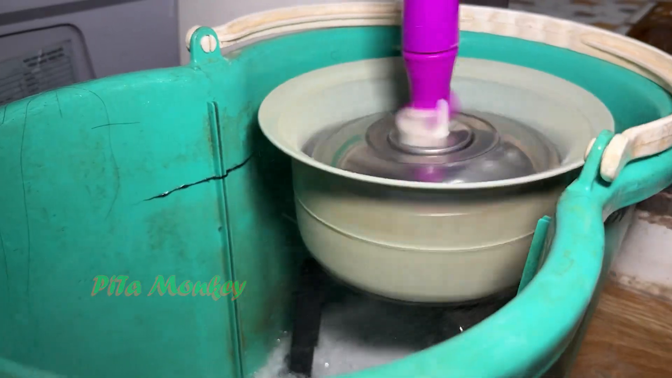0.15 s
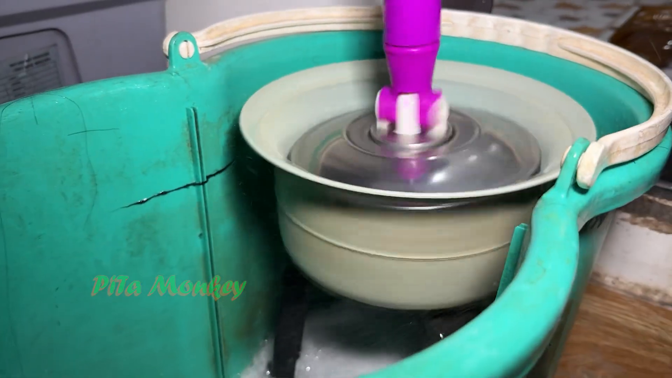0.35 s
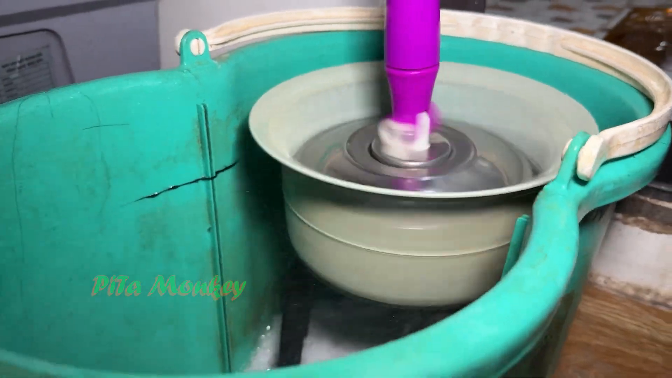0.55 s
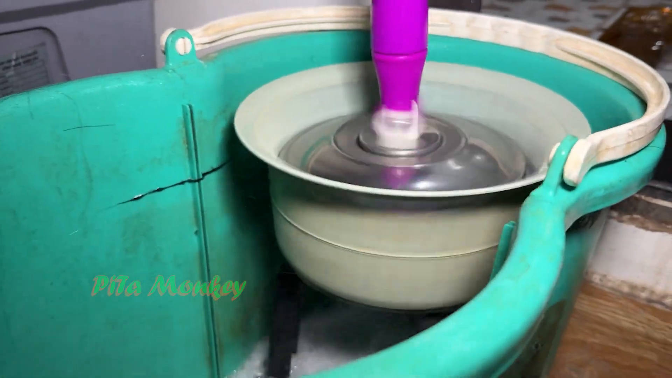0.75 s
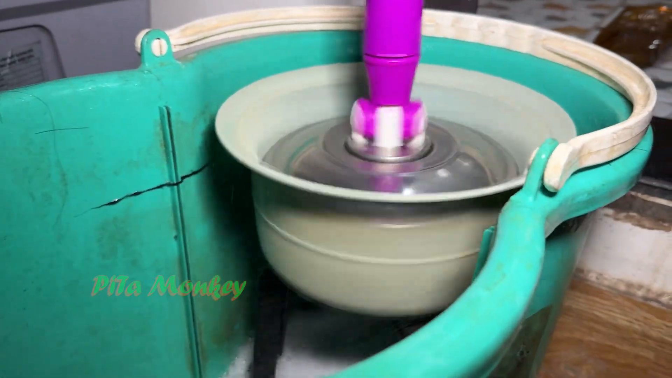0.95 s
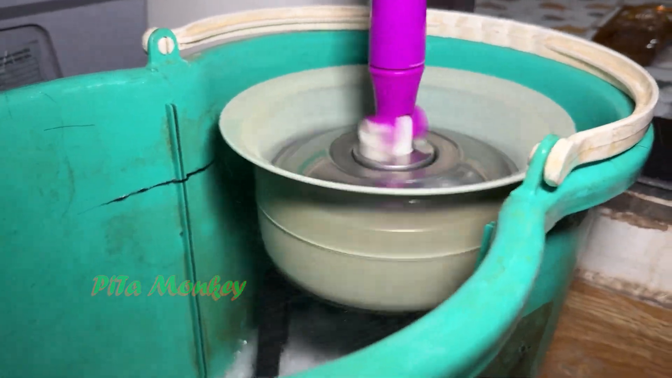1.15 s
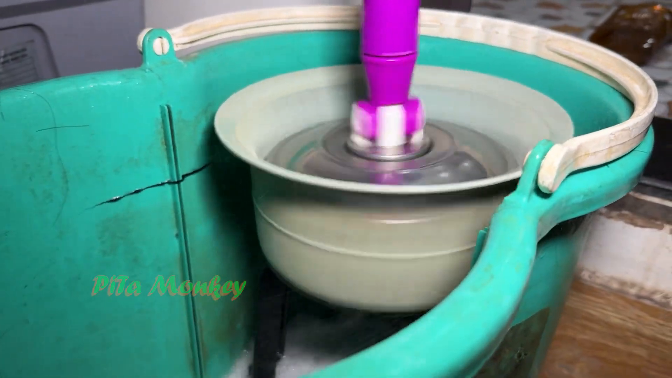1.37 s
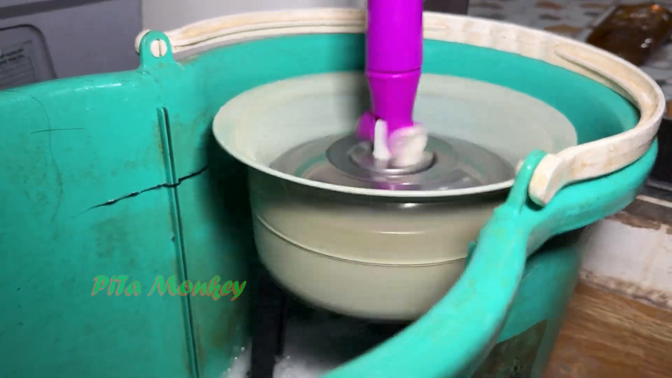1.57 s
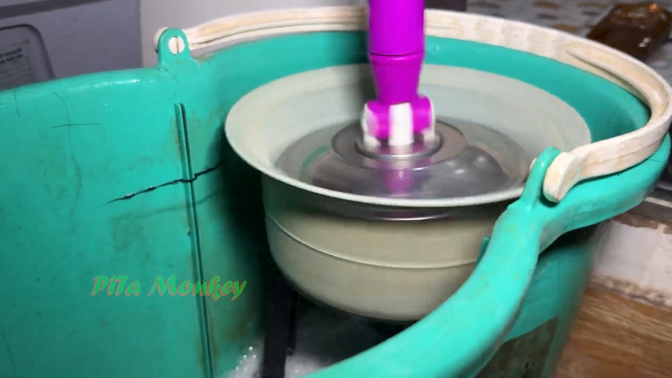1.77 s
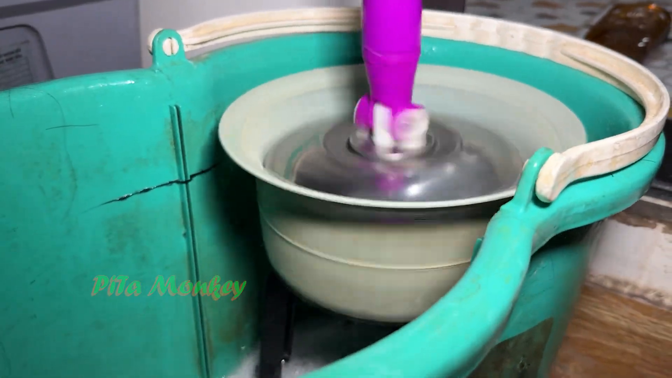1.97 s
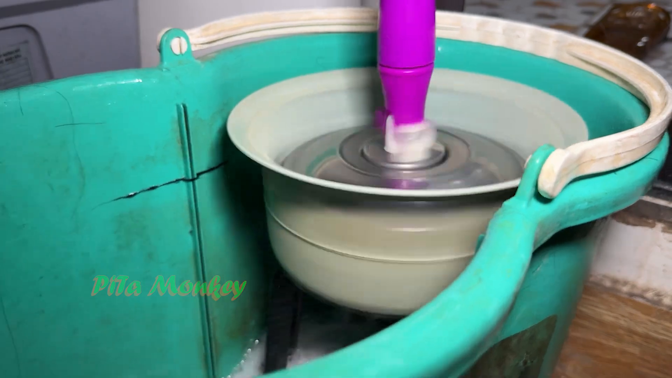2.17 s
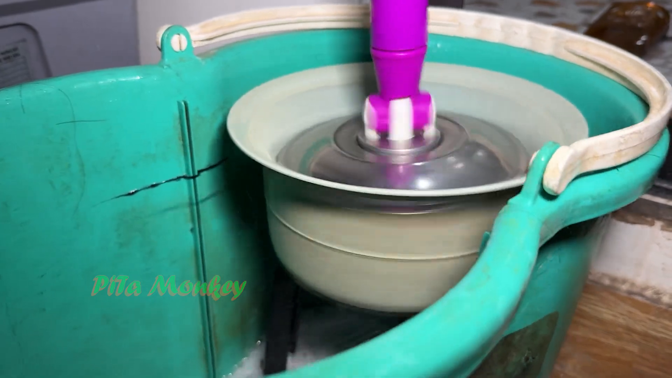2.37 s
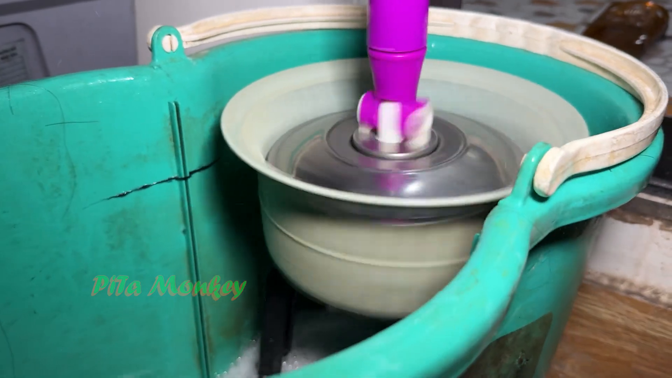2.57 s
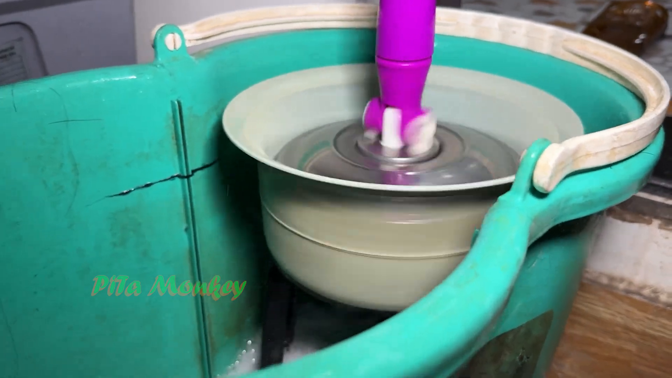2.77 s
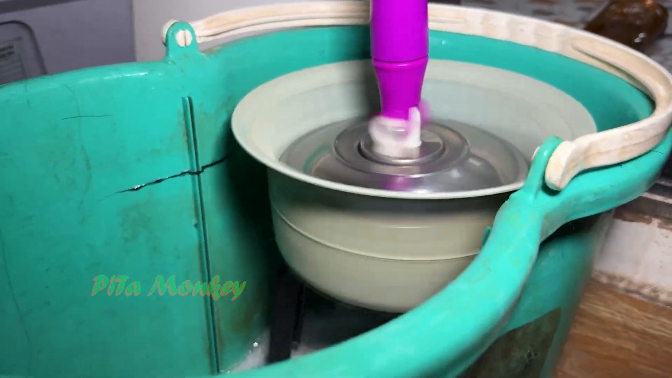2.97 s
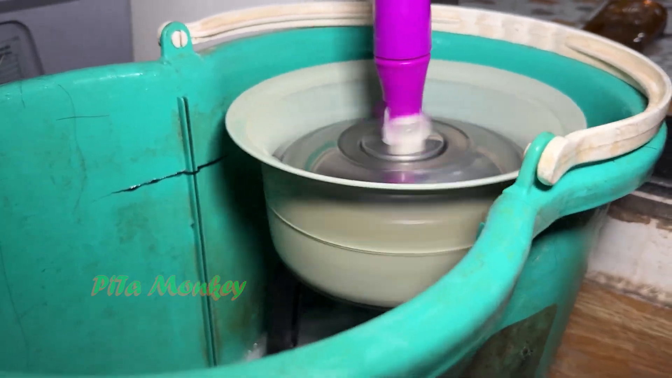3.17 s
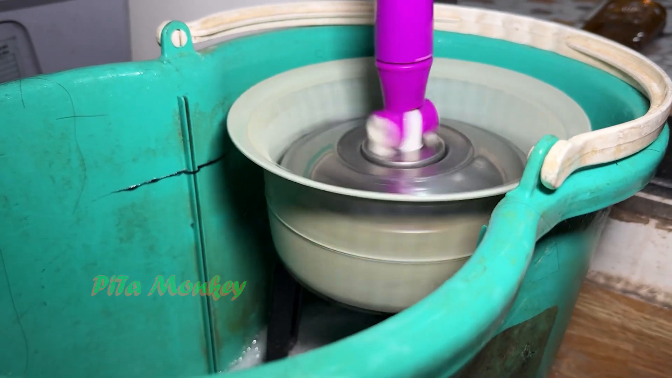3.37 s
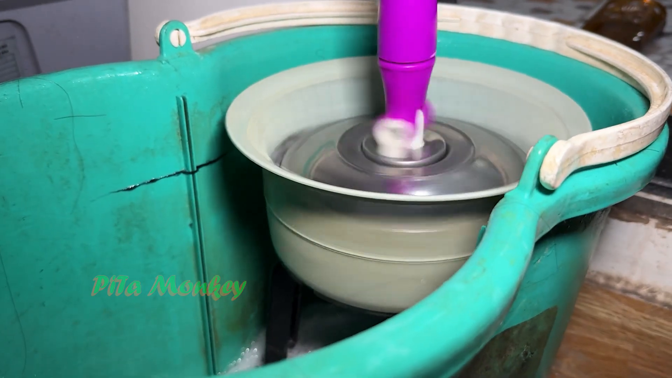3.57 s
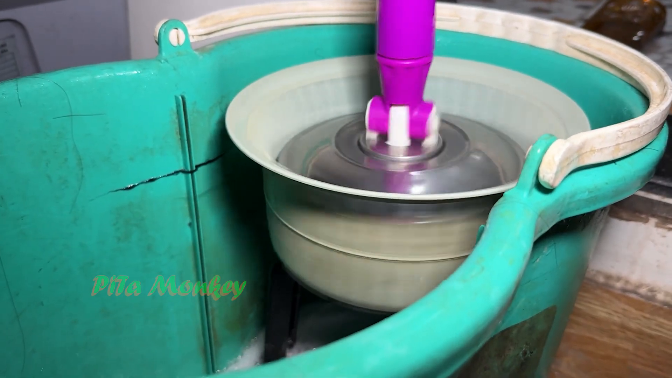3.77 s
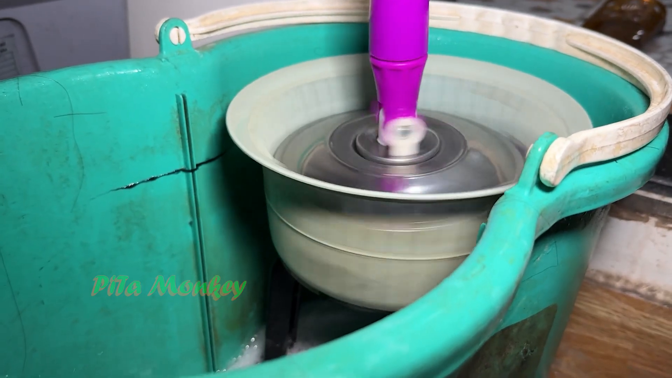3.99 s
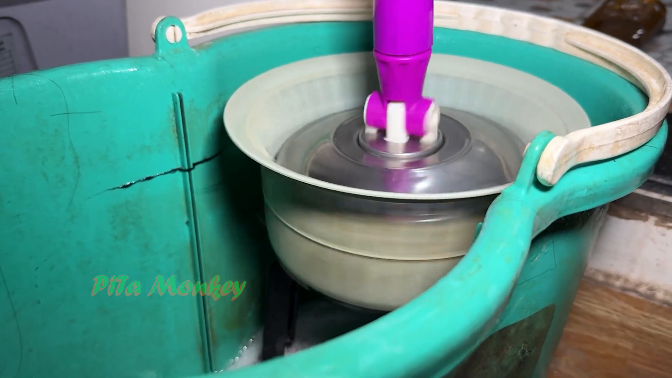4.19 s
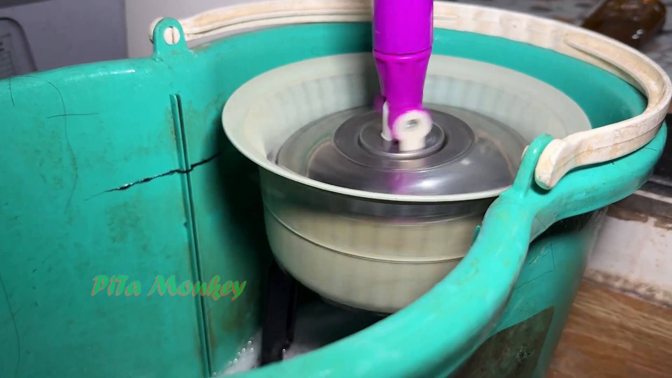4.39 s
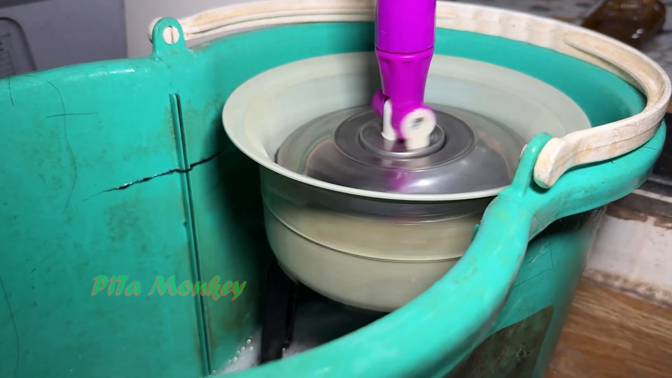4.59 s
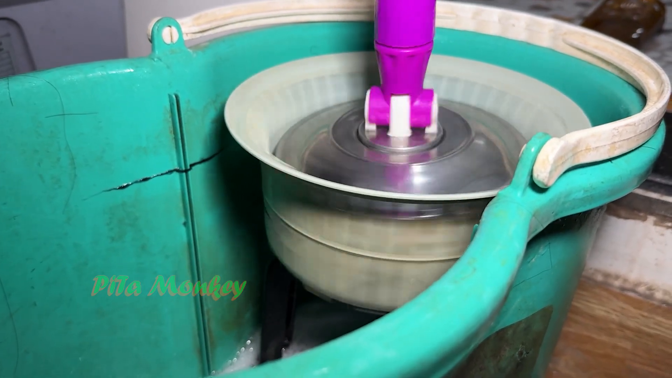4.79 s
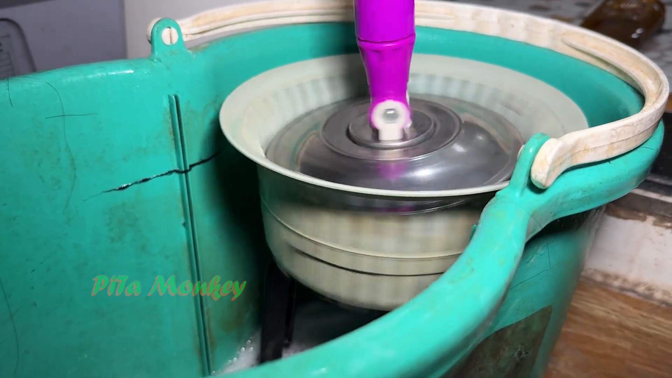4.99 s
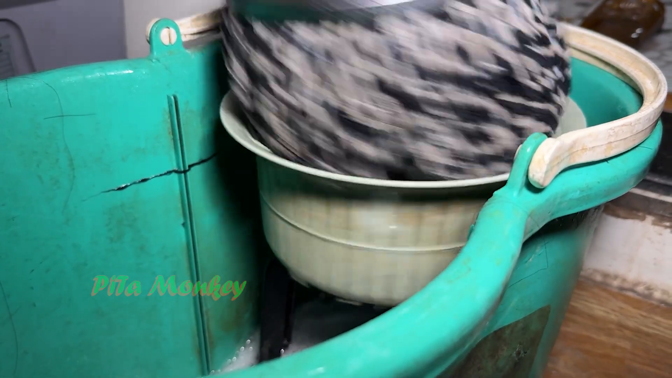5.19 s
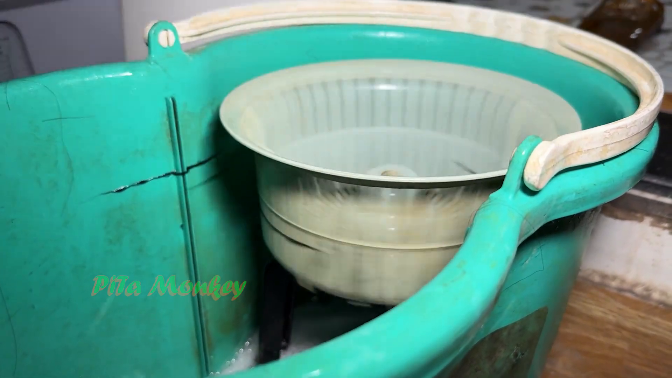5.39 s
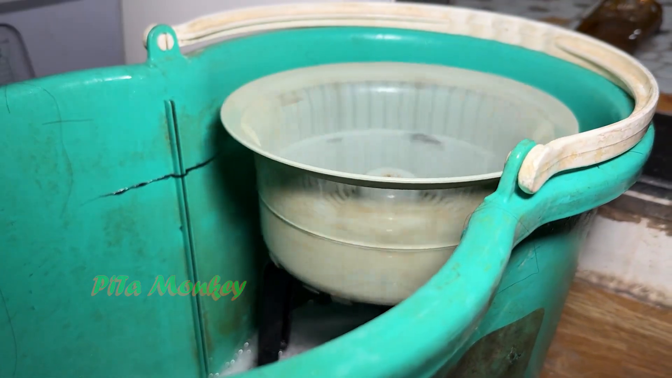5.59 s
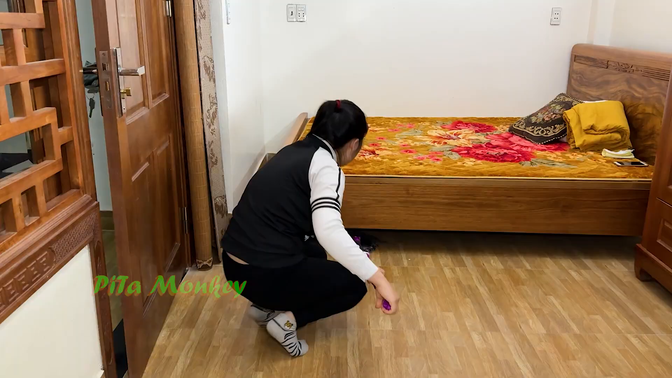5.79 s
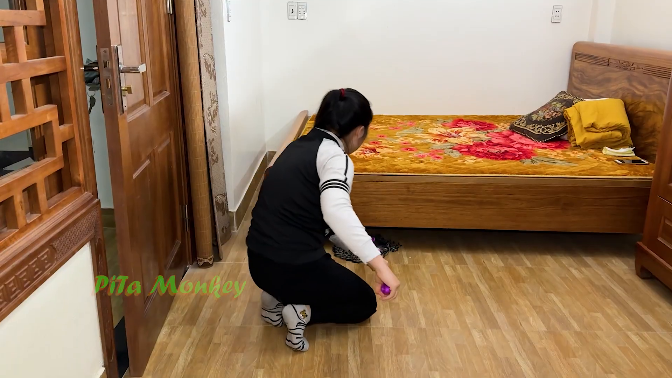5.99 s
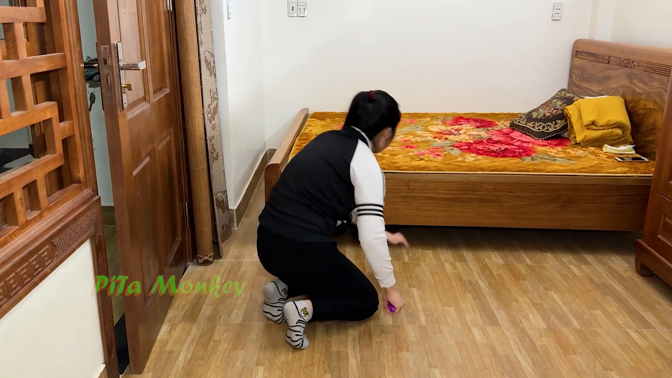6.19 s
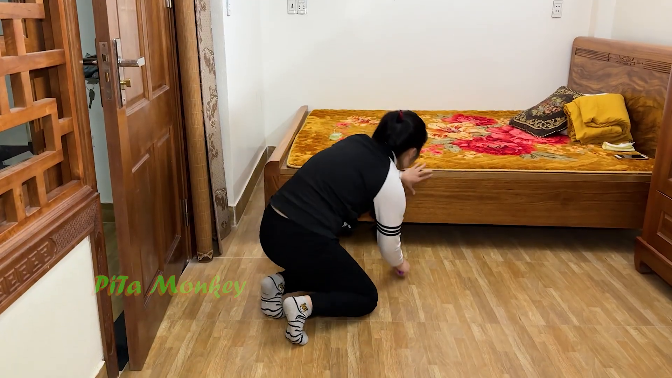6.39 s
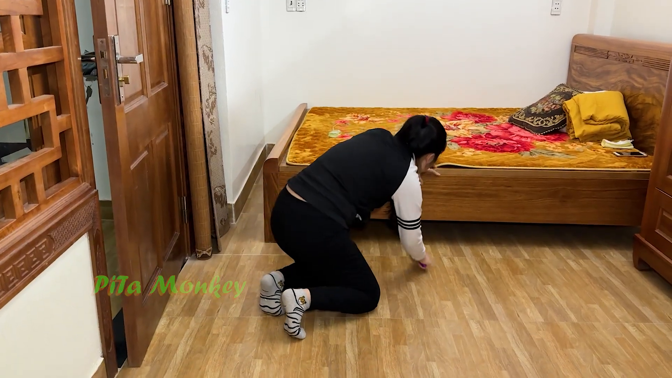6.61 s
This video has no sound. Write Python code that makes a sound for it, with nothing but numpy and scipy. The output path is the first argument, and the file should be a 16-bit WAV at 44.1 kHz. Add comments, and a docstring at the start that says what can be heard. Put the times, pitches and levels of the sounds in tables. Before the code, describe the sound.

Close up in a hard-walled room, a spin mop is pumped in a plastic bucket: about four cracking thuds a second over a fast rattling, ticking whir with watery hiss. Pumping stops and the basket coasts, growl sinking and ticks spreading apart. The loose handle clacks, the mop is knocked free with a metallic ring, drops tick. Then a faint motor hum, rustling and dull thumps on a wooden floor.

```python
"""Spin mop in a wringer basket

A spin mop is pumped in the wringer basket of a plastic bucket, close to a phone in a hard-walled room.
Each push locks the drive with a thud of damped modes; shaped noise makes the basket rumble and rattle, and
bursts once a turn make it tick, ever more slowly as it coasts. The handle clacks and the mop is knocked free.
Then a far motor hums in beating sines, and filtered noise thumps dully on a wooden floor."""
import sys
import numpy as np
from scipy import signal
from scipy.fft import rfft, irfft
from scipy.io import wavfile
from scipy.ndimage import uniform_filter1d

SR = 44100
rng = np.random.default_rng(int(sys.argv[2]) if len(sys.argv) > 2 else 0)


def persist_wave(psi):
    """Save psi, clipped to +-1, as 16-bit WAV."""
    counts = np.round(np.clip(psi, -1, 1) * 32767).astype(np.int16)
    wavfile.write(sys.argv[1], SR, np.atleast_2d(counts).T)


N = 293261
T = np.arange(N) / SR

# The drive catching, the last row the mop knocked free. Each row: start in seconds, relative levels of
# thud, crack and snap in dB, pitch ratio of the thud, level of the shudder in dB.
PUSHES = [(0.043, -18.5, -31, -35, 0.96, -83), (0.3497, -11, -32.5, -46, 0.98, -37),
          (0.613, -14.5, -30, -25, .96, -77), (0.915, -17, -64, -43, 0.89, -39.5),
          (1.161, -11.5, -31.5, -25.5, 0.97, -59), (1.4521, -14, -34, -24, 0.92, -36),
          (1.733, -14.5, -28.5, -23, 0.92, -54), (1.986, -16, -32, -24, 0.92, -40.5),
          (2.2955, -15, -29.5, -23, 1, -74), (2.563, -19.5, -35.5, -30.5, 0.83, -42.5),
          (2.869, -11.5, -34, -51, 0.96, -49), (5.067, -19, -32.5, -25.5, 0.95, -73)]
# Modes of the loaded shaft. Each row: frequency in Hz at pitch ratio 1, t60 in seconds, level in dB.
DRIVE_MODES = [(264, 0.035, 1), (329, 0.018, 8), (442.5, 0.026, 1), (855, 0.0013, -50)]
# Modes of the bucket. Each row: frequency in Hz, t60 in seconds, relative level in dB.
BUCKET_MODES = [(180.3, 0.15, -13.5), (207.5, 0.18, -5.5), (248, 0.31, -7), (268.4, 0.043, 10),
                (289.3, 0.26, -2.5), (397, 0.034, 8), (457, 0.059, 2), (484.5, 0.15, 1)]
# Spectrum of the plastic crack. Each row: frequency in Hz, relative level in dB.
CRACK_TONE = [(400, -9.5), (900, 10.5), (1400, 3), (2200, -9.5), (3100, 1.5), (4500, -5.5), (7000, -13.5),
              (12000, -9)]
# Spectrum of sharp ticks, snaps and spray. Each row: frequency in Hz, relative level in dB.
TICK_TONE = [(1500, 7), (3000, 11), (6000, -3.5), (8000, 5.5), (10800, 4), (11600, 6), (12400, 1),
             (16000, 8.5)]


def pushes(thud_db=9, crack_db=8, snap_db=7, contact_s=0.0032, lag_s=0.00067, boom_db=-21, hardness=0.49):
    """Impact excitation: the drive catches with a crack, a damped thud of the shaft and a ringing bucket."""
    thud = np.zeros((2, N))
    usual_crack_db = np.mean(PUSHES, axis=0)[2]
    lowest_hz = DRIVE_MODES[0][0]
    for s, db, crack, _, pitch, _ in PUSHES:
        # a softer catch leaves mostly the lowest mode
        tilt_db = hardness * (crack - usual_crack_db)  # per octave
        modes = [(hz, t60, part + tilt_db * np.log2(hz / lowest_hz)) for hz, t60, part in DRIVE_MODES]
        onset = 1 - np.exp(-T[:SR] / contact_s)
        add(thud, s + lag_s, -amp(db + thud_db) * ring(modes, pitch) * onset / 2)
        bucket_pitch = 1 + 0.016 * rng.standard_normal()
        add(thud, s, amp(db + boom_db) * ring(BUCKET_MODES, bucket_pitch))
    s, _, crack, snap, _, _ = np.transpose(PUSHES)
    cracks = bursts(s, crack + crack_db, t60=0.036, width=0.52, rise_s=0.00011)
    snaps = bursts(s + lag_s, snap + snap_db, t60=0.014, width=0.6, rise_s=0.0005)
    return thud + colour(cracks, CRACK_TONE) + colour(snaps, TICK_TONE)


# Spectrum of the shudder. Each row: frequency in Hz, relative level in dB.
SHUDDER_TONE = [(20, -63), (40, -22), (58, -14.5), (83, -5), (105, -15), (130, -20.5), (190, -19.5),
                (400, -60.5)]


def shudder(delay_s=0.1, length_s=0.05, steady=(-50.5, 5, 0.6)):
    """Forced vibration: the bucket shudders just after each push, and a little all the while it turns."""
    swell = swells([(row[0] + delay_s, length_s, row[-1]) for row in PUSHES])[0]
    return (swell + amp(spin_db(steady))) * colour(noise(width=0.26), SHUDDER_TONE)


# Speed of the basket while the handle is pumped. Each row: time in seconds, speed in turns per second.
SPEED = [(0, 13.72), (.42, 13.59), (.6, 14.8), (1.0, 13.38), (1.17, 15.06), (1.55, 12.91), (1.72, 14.41),
         (2.05, 12.44), (2.2, 13.91), (2.65, 12.94), (2.93, 13.05)]
# coasting: dry friction in turns per second lost each second, time constant of the drag in seconds
FRICTION, DRAG_S = 1.687, 2.63


def speed():
    """Coulomb friction with viscous drag: turns per second follow the table, then run down to rest."""
    s, rate = np.transpose(SPEED)
    coasted = np.maximum(T - s[-1], 0)
    offset = FRICTION * DRAG_S
    return np.maximum((np.interp(T, s, rate) + offset) * np.exp(-coasted / DRAG_S) - offset, 0)


FIRST_TICK_S, LAST_TICK_S = 0.071, 4.45


def turns():
    """Angle as the integral of speed: turns of the basket since its first tick."""
    count = np.cumsum(speed()) / SR
    return count - np.interp(FIRST_TICK_S, T, count)


def each_turn(angle, until_s):
    """Phase crossing: times at which the basket passes an angle, given as a share of a turn."""
    turn = turns()
    return np.interp(np.arange(angle, np.interp(until_s, T, turn)), turn, T)


# after the last push the mop head settles, and its load comes off the basket
SETTLE_AT_S, SETTLE_S = 2.94, 0.81


def spin_db(law):
    """Power law of speed: dB of a noise that grows with the speed of the basket and the load on it."""
    db, unloaded_db, power = law
    rate = speed()
    speed_db = 20 * np.log10(np.maximum(rate / rate.max(), 1e-3))
    return db - unloaded_db * ramp(SETTLE_AT_S, SETTLE_S) + power * speed_db


# Laws of the spin noises. Each: relative level in dB at full speed and load, dB lost without load,
# power of the speed.
RUMBLE = (-41.5, 12.4, 0.62)
RATTLE = (-49, 6, 1.8)
SPRAY = (-55.5, 7.9, 0.5)
DRYING_DB_PER_S = 2.5
# Spectrum of the rattle. Each row: frequency in Hz, relative level in dB.
RATTLE_TONE = [(300, -19), (560, 6.5), (900, 5.5), (1300, 4), (1750, 2.5), (2150, -3), (3100, -9),
               (4500, -16), (6000, -18), (9000, -22.5)]


def basket(rattle_db=-4, wobble_db=1.5, surge_db=3, surge_delay_s=0.14, surge_s=0.085):
    """Amplitude modulation: the bearing rumbles through the bucket; rattle and flung water swell twice a
    turn and surge after each push."""
    surge = swells([(row[0] + surge_delay_s, surge_s, 0) for row in PUSHES[:-1]])[0]
    wobble = amp(wobble_db * np.cos(4 * np.pi * turns()) + surge_db * (surge + 0.5))
    rumble = amp(spin_db(RUMBLE)) * body(grit(width=0.21, spread_db=4), BUCKET_MODES)
    rattle = amp(spin_db(RATTLE) + rattle_db) * colour(grit(width=0.3, spread_db=8.5), RATTLE_TONE)
    spray = amp(spin_db(SPRAY) - DRYING_DB_PER_S * T) * colour(noise(width=1.0), TICK_TONE)
    return rumble + wobble * (rattle + spray)


# How hard the spindle catches. Each row: time in seconds, relative level in dB.
CATCH = [(0, -37.5), (.58, -33), (.9, -40.5), (1.3, -41.5), (2.4, -41.5), (3.35, -52), (3.8, -45.5),
         (4.4, -49)]
# Modes of the hub. Each row: frequency in Hz, t60 in seconds, relative level in dB.
HUB_MODES = [(706, 0.046, -0.5), (964, 0.043, 10), (1290, 0.038, 1), (1510, 0.012, 15.5),
             (1833, 0.14, -3.5)]


def ticks(tick_db=9, hub_db=4, scatter_db=1.9, tail_db=-17):
    """Periodic impulses: the basket catches on its spindle once a turn, with a tick, a fizz and a hub ring."""
    s = each_turn(0, LAST_TICK_S)
    db = np.interp(s, *np.transpose(CATCH)) + scatter_db * rng.standard_normal(len(s))
    tick = bursts(s, db + tick_db, t60=0.02, width=0.84, rise_s=0.00047)
    fizz = bursts(s, db + tick_db + tail_db, t60=0.13, width=1.0, rise_s=0.0012)
    jolt = bursts(s, db + hub_db, t60=0.037, width=0.62, rise_s=0.0012)
    return colour(tick + fizz, TICK_TONE) + body(jolt, HUB_MODES)


# Hardest bumps of the mop head, the last two on the rim as it leaves. Each row: start in seconds,
# relative level of the clatter in dB, relative level of the bucket in dB.
BUMPS = [(0.478, -32.5, -24.5), (0.556, -35, -29), (0.987, -33, -28), (1.115, -35.5, -46),
         (1.52, -28, -25.5), (1.532, -34, -18.5), (2.054, -49, -25), (2.233, -37, -51), (2.97, -35, -39.5),
         (3.125, -38, -34.5), (3.205, -41, -35.5), (4.092, -57, -39), (4.328, -51.5, -43),
         (4.524, -64, -48), (4.637, -69, -62), (5.225, -46.5, -32.5), (5.246, -46, -31.5)]


def bumps(clatter_db=3, bucket_db=1, angle=0.53, light_clatter_db=3, light_bucket_db=1, scatter_db=3):
    """Rotating imbalance: the lopsided mop head slaps the basket about half a turn after each tick, now
    and then hard, and shakes the bucket."""
    s = each_turn(angle, PUSHES[-1][0])
    force_db = scatter_db * np.clip(rng.standard_normal(len(s)), -2, 1)
    light_clatter = np.interp(s, T, spin_db(RATTLE)) + light_clatter_db + force_db
    light_bucket = np.interp(s, T, spin_db(RUMBLE)) + light_bucket_db + force_db
    s, clatter_level, bucket_level = np.hstack([np.transpose(BUMPS), [s, light_clatter, light_bucket]])
    slaps = bursts(s, clatter_level + clatter_db, t60=0.084, width=0.56, rise_s=0.0016)
    shakes = bursts(s, bucket_level + bucket_db, t60=0.052, width=0.1, rise_s=0.00092)
    return colour(slaps, RATTLE_TONE) + body(shakes, BUCKET_MODES)


# bearing growl at full speed, and the power of the speed that its pitch follows
GROWL_HZ, GROWL_POWER = 298.7, 0.62


def growl(growl_db=-53, half_db=-9, power=0.53, swell_db=5, waver=0.0762, rough=0.72):
    """Frequency modulation with a subharmonic: the coasting bearing growls, sinks with the speed, swells
    between ticks and ends as the mop is lifted."""
    pace = speed() / speed().max()
    hz = GROWL_HZ * pace ** GROWL_POWER * (1 + waver * wander(size=1500))
    phase = 2 * np.pi * np.cumsum(hz) / SR
    coasting = ramp(SPEED[-1][0], 0.11) * (1 - ramp(4.78, 0.25))
    level = amp(growl_db - swell_db * np.cos(2 * np.pi * turns())) * pace ** power * coasting
    tone = np.sin(phase) + amp(half_db) * np.sin(phase / 2)
    return level * (1 + rough * wander(size=600)) * tone


def clatter(law=(-34, 6, 1.3), t60=0.014, spread_db=4.0, low_hz=700, high_hz=2700, count=520):
    """Random contacts: loose plastic parts chatter, a few of them hard, each with its own short ring."""
    out = np.zeros((2, N))
    for when, height, force, side in rng.random((count, 4)):
        hz = low_hz * (high_hz / low_hz) ** height
        db = spread_db * (min(-np.log(1 - force), 3) - 3)
        modes = [(hz, t60, 0), (hz * np.sqrt(2), t60 / 2, 0), (hz * np.sqrt(3), t60 / 2, -5)]
        contact = ring(modes) * amp(db) * 2 ** -height
        pan = np.sqrt([2 * side, 2 - 2 * side])
        add(out, when * T[-1], np.outer(pan, contact))
    return amp(spin_db(law)) * out


# Play in the handle's joint. Each row: start in seconds, relative level in dB.
CLACKS = [(0.75, -35.5), (4.7638, -53.5), (4.7894, -44), (4.8388, -55.5), (4.9083, -48.5), (4.9238, -37),
          (4.9323, -44), (4.9515, -46), (4.9613, -42.5)]
# Strokes of the handle in its sleeve. Each row: centre in seconds, half length in seconds, level in dB.
RASPS = [(.77, 0.032, -45.5), (.89, 0.036, -44.5), (1.3, 0.017, -48), (1.38, .03, -46.5),
         (1.52, 0.011, -39), (2.03, 0.044, -43), (4.97, 0.048, -58.5)]
# Spectrum of the plastic sleeve. Each row: frequency in Hz, relative level in dB.
SLEEVE_TONE = [(600, -3), (1300, 1.5), (1800, 16), (2250, 3.5), (3000, 3.5), (3350, 4.5), (3900, 4.5),
               (4500, -0.5), (5500, -24.5), (12000, -23)]
# Modes of the handle. Each row: frequency in Hz, t60 in seconds, relative level in dB.
HANDLE_MODES = [(500, 0.051, 25.5), (1550, 0.027, -50), (1870, 0.14, 7), (4440, 0.013, -25)]


def handle(clack_db=5, ring_db=-1, sliding=(-56, 10, 1.0)):
    """Sliding friction and joint impacts: the handle rasps in its sleeve, and its loose joint clacks."""
    s, db = np.transpose(CLACKS)
    clacks = bursts(s, db, t60=0.033, width=0.5, rise_s=0.0001)
    rasp = (swells(RASPS)[0] + amp(spin_db(sliding))) * grit(width=0.97, spread_db=4.0)
    return colour(amp(clack_db) * clacks + rasp, SLEEVE_TONE) + amp(ring_db) * body(clacks, HANDLE_MODES)


# Wet strands brush the basket as the mop is lifted. Each row: centre in seconds, half length in seconds,
# levels of bucket, rattle and hiss in dB.
BRUSHES = [(4.97, 0.11, -57, -63, -57.5), (5.26, 0.024, -45.5, -57, -75)]
# Spectrum of water and cloth hiss. Each row: frequency in Hz, relative level in dB.
HISS_TONE = [(2000, 2), (5000, -3), (7000, -4.5), (8000, 3.5), (11000, 1), (16000, 0)]


def lift(bucket_db=-36, bucket_t60=0.86, sleeve_db=-51, sleeve_t60=0.94, spray_db=-50, spray_t60=0.37):
    """Exponential decay of shaken bodies: knocked free, the mop leaves bucket and sleeve shaking and sheds
    water; its strands brush the basket."""
    bucket, rattle, hiss = swells(BRUSHES)
    sleeve = np.zeros(N)
    free_s = PUSHES[-1][0]
    add(bucket, free_s, amp(bucket_db) * fade(bucket_t60))
    add(sleeve, free_s, amp(sleeve_db) * fade(sleeve_t60))
    add(hiss, free_s, amp(spray_db) * fade(spray_t60))
    out = bucket * body(grit(width=0.31, spread_db=4.5), BUCKET_MODES)
    out += rattle * colour(grit(width=0.49, spread_db=8), RATTLE_TONE)
    out += sleeve * colour(noise(width=0.72), SLEEVE_TONE)
    return out + hiss * colour(noise(width=0.59), HISS_TONE)


# Steel disc of the mop head. Each row: central frequency in Hz, t60 in seconds, relative level in dB.
DISC_MODES = [(860, 0.15, 10), (1470, 0.073, 10), (1890, 0.086, 10.5), (2990, 0.61, -2), (3700, 0.65, -2),
              (4030, 0.75, -7), (6000, 0.28, -5)]


def disc(ring_db=-55, spread=0.012, count=9):
    """Near-degenerate modes: the steel disc of the mop head rings in close clusters when knocked free."""
    out = np.zeros((2, N))
    for channel in out:
        for pitch, polarity in rng.standard_normal((count, 2)):
            tone = ring(DISC_MODES, 1 + spread * pitch)
            add(channel, PUSHES[-1][0], amp(ring_db) * np.sign(polarity) * tone)
    return out


# Water drops. Each row: start in seconds, relative level in dB.
DRIPS = [(5.6569, -42), (5.909, -44.5)]


def drips(drip_db=3):
    """Short broadband impacts: drops tick on the plastic."""
    s, db = np.transpose(DRIPS)
    drops = bursts(s, db + drip_db, t60=0.02, width=0.94, rise_s=0.00035)
    return colour(drops, [(1200, 1), (2800, 5.5), (5500, 5), (9000, -3), (16000, -13)])


# Spectrum of the reverberation. Each row: frequency in Hz, relative level in dB.
ROOM_TONE = [(50, -29.5), (150, 8), (270, 2.5), (380, -6.5), (490, -1.5), (650, 1.5), (1500, 0),
             (3500, -4.5), (6000, -0.5), (9000, -4.5), (16000, -13.5)]


def room(x, wet_db=-9, t60=0.76, gap_s=0.0012):
    """Diffuse reverberation of hard walls: alike on both sides in the bass, unrelated above."""
    mid, side = rng.standard_normal((2, SR)) * fade(t60) * np.clip(T[:SR] / gap_s - 1, 0, 1)
    side = signal.sosfilt(signal.butter(1, 700, "high", fs=SR, output="sos"), side)
    tail = colour(np.array([mid + side, mid - side]), ROOM_TONE)
    return x + amp(wet_db) * through(x, tail / np.linalg.norm(tail[0]))


# Weight shifts on the floor. Each row: centre in seconds, half length in seconds, levels of boom, rustle
# and hiss of cloth in dB.
SHIFTS = [(6.04, 0.027, -38.5, -59, -78), (6.13, 0.042, -38.5, -56, -84), (6.245, 0.044, -41.5, -47, -84),
          (6.42, 0.057, -56, -49.5, -51), (6.63, 0.084, -42, -62, -62.5)]
# Dull blows on the floor. Each row: start in seconds, relative level in dB, low-pass corner in Hz.
THUMPS = [(6.416, -26.5, 900), (6.445, -25.5, 600), (6.481, -27.5, 219), (6.529, -38.5, 700),
          (6.598, -37, 250)]
# Spectra of boom, rustle and blows. Each row: frequency in Hz, relative level in dB.
BOOM_TONE = [(30, -63), (62, -8.5), (83, 3), (100, -12), (150, -11), (300, -69)]
RUSTLE_TONE = [(150, 6), (300, 0.5), (460, 3), (620, 4.5), (780, -4.5), (1000, -31), (2200, -23),
               (6000, -43)]
THUMP_TONE = [(25, -49), (58, 9), (85, -34), (120, -2.5), (190, -3), (310, -13), (440, -11), (580, -15),
              (750, -8.5), (1000, -24), (1600, -22), (5000, -32)]


def floorboards(t60=0.57, rise_s=0.0017):
    """Low-passed impacts: weight shifts on the floor with a rustle, and dull blows boom."""
    boom, rustle, cloth = swells(SHIFTS)
    blows = np.zeros((2, N))
    for s, db, hz in THUMPS:
        blow = noise(width=0.3, size=SR) * fade(t60) * (1 - np.exp(-T[:SR] / rise_s))
        dull = signal.sosfilt(signal.butter(2, hz, fs=SR, output="sos"), blow)
        add(blows, s, amp(db) * dull)
    shifting = boom * colour(noise(width=0.1), BOOM_TONE) + rustle * colour(noise(width=0.38), RUSTLE_TONE)
    return colour(blows, THUMP_TONE) + shifting + cloth * colour(noise(width=0.53), HISS_TONE)


# Lines of the motor. Each row: mean frequency in Hz, relative level in dB.
MOTOR_LINES = [(117.5, -13), (141, -7.5), (165.5, -2), (188.5, -17), (282, -24)]
# the quiet room with the motor fades in
ROOM_AT_S, ROOM_FADE_S = 5.4, 0.61


def motor(hum_db=-48, swell=(6.1, 0.12, -47)):
    """Beating: neighbouring orders of a far motor throb, and swell once (s, half length s, dB)."""
    drift = np.cumsum(1 + 0.00368 * wander(size=12000)) / SR
    hum = sum(amp(db) * np.sin(2 * np.pi * (hz * drift + rng.random())) for hz, db in MOTOR_LINES)
    return unit(hum) * (amp(hum_db) + swells([swell])[0]) * ramp(ROOM_AT_S, 0.38)


# Spectrum of the room rumble. Each row: frequency in Hz, relative level in dB.
AIR_TONE = [(25, -5), (70, 4.5), (200, 11.5), (500, 6), (1100, -1), (1900, 3), (3000, -3), (5000, -11),
            (8000, -18), (16000, -31)]


def air(early_db=-74, late_db=-54, early_hiss_db=-77, late_hiss_db=-66):
    """Stationary noise floor: room rumble and a thin hiss, both louder once the motor is heard."""
    late = ramp(ROOM_AT_S, ROOM_FADE_S)
    low = amp(early_db) + amp(late_db) * late
    hiss = amp(early_hiss_db) + amp(late_hiss_db) * late
    return low * colour(noise(width=0.92), AIR_TONE) + hiss * colour(noise(width=1.0), HISS_TONE)


def amp(db):
    """Logarithmic level: decibels to gain."""
    return 10 ** (np.asarray(db) / 20)


def unit(x):
    """Normalisation: scale to rms 1."""
    return x / np.sqrt(np.mean(x ** 2))


def add(track, s, x):
    """Superposition: mix a short sound in at time s."""
    i = max(int(s * SR), 0)
    track[..., i:i + x.shape[-1]] += x[..., :N - i]


def fade(t60):
    """Exponential decay, down 60 dB after t60."""
    return np.exp(-np.log(1000) * T[:SR] / t60)


def ramp(s, length_s):
    """Linear fade: rise from 0 at time s to 1 after length_s."""
    return np.clip((T - s) / length_s, 0, 1)


def swells(table):
    """Gaussian envelopes from rows (s, half length s, dB, ..): one gain curve for each dB column."""
    s, half, *columns = np.transpose(table)
    bells = np.exp(-((T - s[:, None]) / half[:, None]) ** 2 / 2)
    return [amp(db) @ bells for db in columns]


def through(x, response):
    """Linear convolution of one or two channels with an impulse response."""
    return signal.oaconvolve(np.atleast_2d(x), np.atleast_2d(response), axes=1)[:, :N]


def colour(x, tone):
    """Minimum-phase filter of unit energy through (Hz, dB) points, by folding the cepstrum."""
    size = 8192
    hz, db = np.transpose(tone)
    bins_hz = np.arange(size // 2 + 1) * SR / size
    gain = amp(np.interp(np.log(bins_hz + 1), np.log(hz), db))
    cepstrum = irfft(np.log(gain))
    cepstrum[1:size // 2] *= 2
    cepstrum[size // 2 + 1:] = 0
    response = irfft(np.exp(rfft(cepstrum)))
    return through(x, response / np.linalg.norm(response))


def ring(modes, pitch=1):
    """Modal synthesis: impulse response of decaying modes."""
    return sum(amp(db) * fade(t60) * np.sin(2 * np.pi * hz * pitch * T[:SR]) for hz, t60, db in modes)


def body(x, modes):
    """Resonance: drive a set of modes, at unit energy."""
    response = ring(modes)
    return through(x, response / np.linalg.norm(response))


def noise(width, size=N):
    """Partly correlated stereo noise; width is side over mid."""
    mid, side = rng.standard_normal((2, size))
    return np.array([mid + width * side, mid - width * side]) / np.sqrt(1 + width ** 2)


def wander(size):
    """Smoothed random process of rms 1 that changes over size samples."""
    return unit(uniform_filter1d(uniform_filter1d(rng.standard_normal(N), size), size))


def grit(width, spread_db):
    """Intermittent contact: noise in clusters a few milliseconds long."""
    return unit(noise(width) * amp(spread_db * np.minimum(wander(size=200), 2)))


def bursts(times, levels, t60, width, rise_s):
    """Impulsive noise: a short decaying crunch of contact at each time."""
    out = np.zeros((2, N))
    shape = fade(t60) * (1 - np.exp(-T[:SR] / rise_s))
    for s, db in zip(times, levels):
        add(out, s, amp(db) * noise(width, size=SR // 5) * shape[:SR // 5])
    return out


def scene(left_db=0.66):
    """Superposition of sources: mop and bucket in the room, then the background, all slightly to the left."""
    spin = pushes() + shudder() + ticks() + bumps() + basket() + growl() + clatter()
    mop = room(spin + handle() + lift() + disc() + drips(), wet_db=-11)
    return (mop + motor() + floorboards() + air()) * amp([[left_db], [-left_db]])


TOP_HZ, SPLIT_HZ = 15400, 7500
PORT_LAG = 14  # samples


def record(dry, ceiling=0.2, low_hz=36):
    """Band limiting and soft saturation: the phone thins the deep bass and rounds the peaks; its treble is
    one signal, late and inverted on the left."""
    hz = np.arange(N // 2 + 1) * SR / N
    treble = irfft(rfft(dry) * np.clip((hz - SPLIT_HZ) / 200, 0, 1), N)
    out = dry - treble + np.array([-np.roll(treble[1], PORT_LAG), treble[1]])
    out = signal.sosfilt(signal.butter(2, low_hz, "high", fs=SR, output="sos"), out)
    out = ceiling * np.tanh(out / ceiling)
    return signal.sosfilt(signal.ellip(8, 0.2, 80, TOP_HZ, fs=SR, output="sos"), out)


dry = scene()
out = record(dry)
persist_wave(out)
```